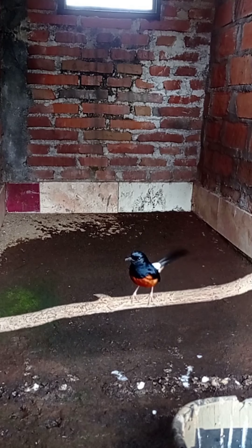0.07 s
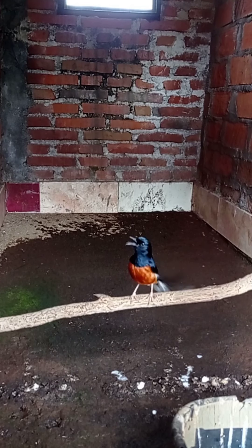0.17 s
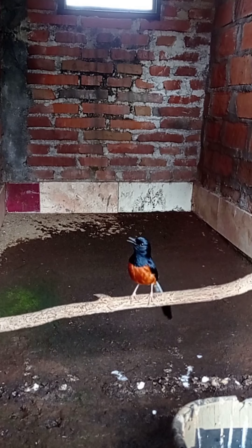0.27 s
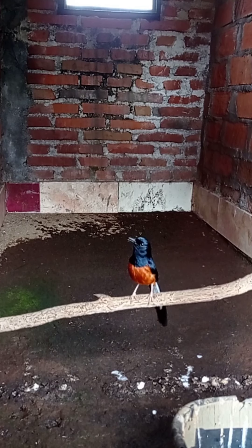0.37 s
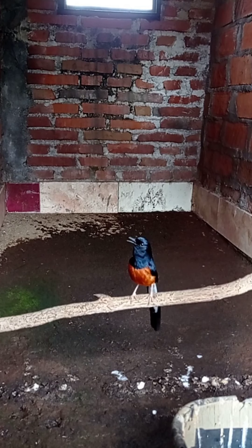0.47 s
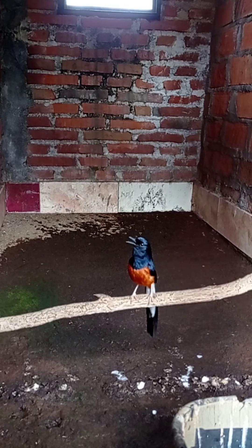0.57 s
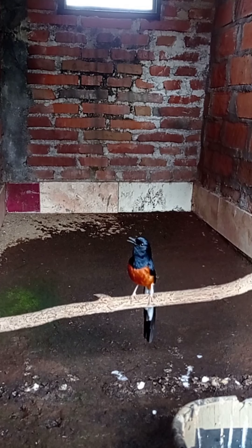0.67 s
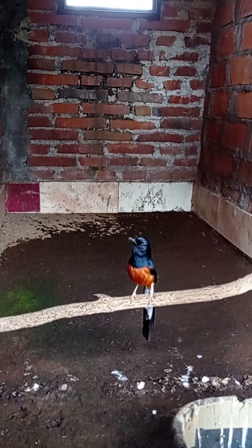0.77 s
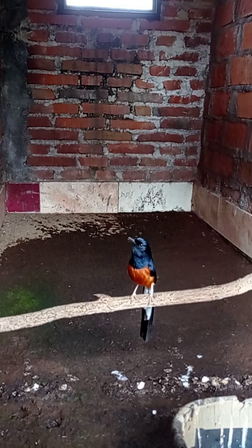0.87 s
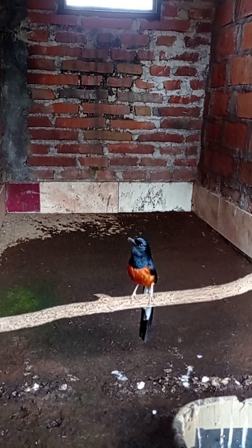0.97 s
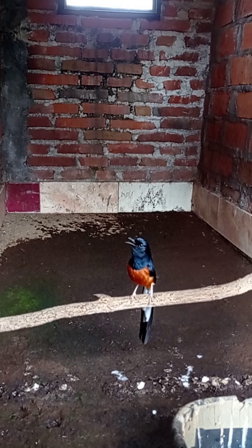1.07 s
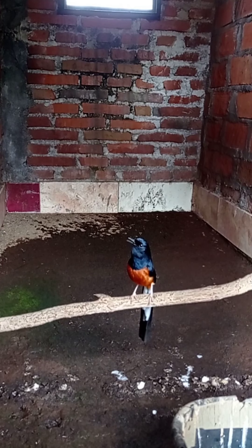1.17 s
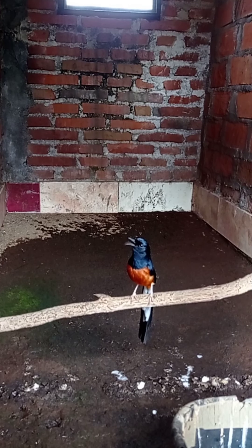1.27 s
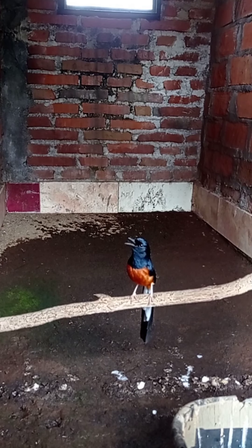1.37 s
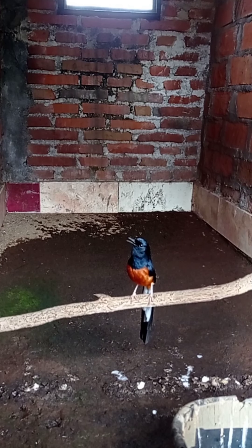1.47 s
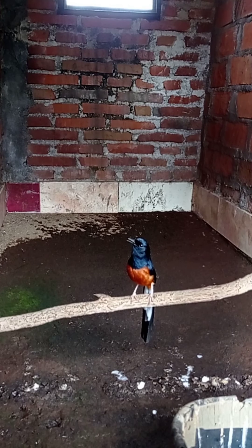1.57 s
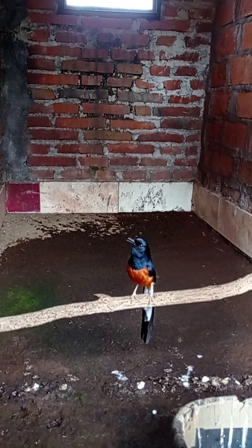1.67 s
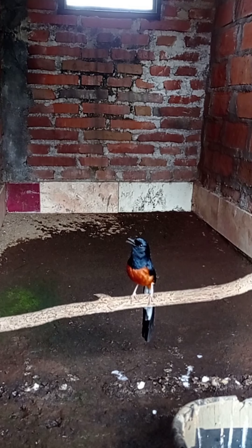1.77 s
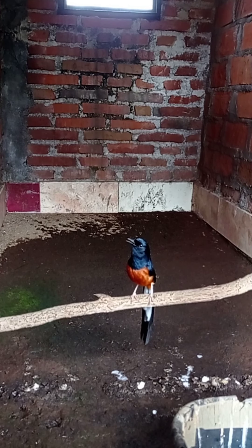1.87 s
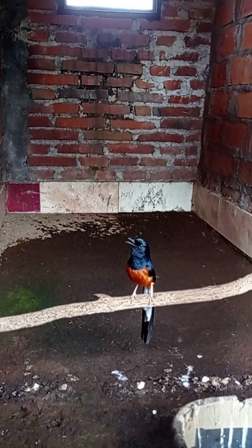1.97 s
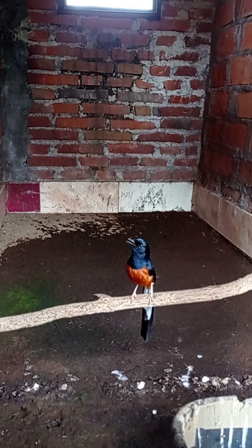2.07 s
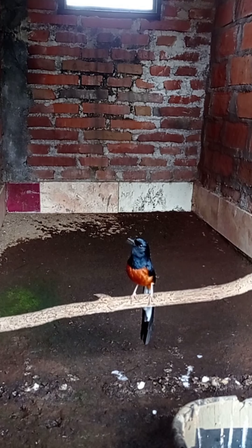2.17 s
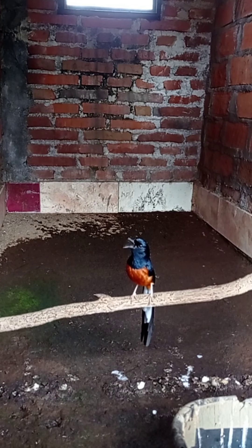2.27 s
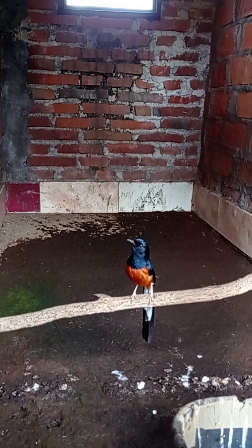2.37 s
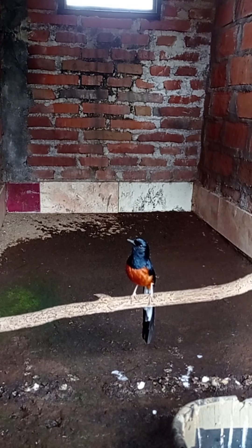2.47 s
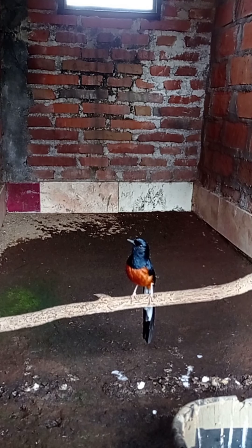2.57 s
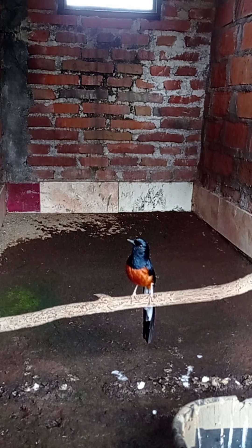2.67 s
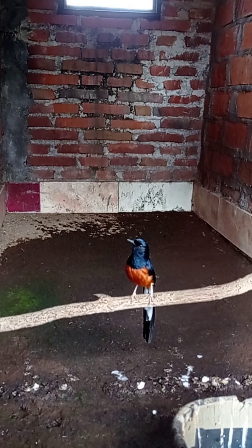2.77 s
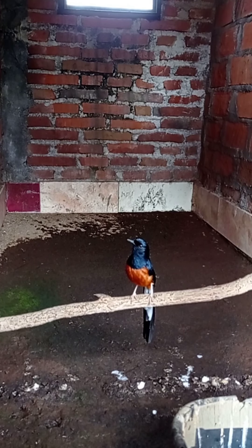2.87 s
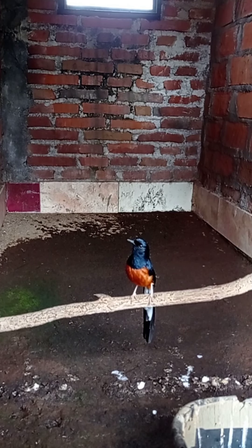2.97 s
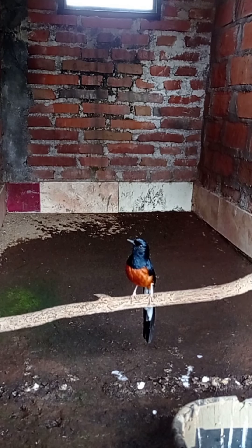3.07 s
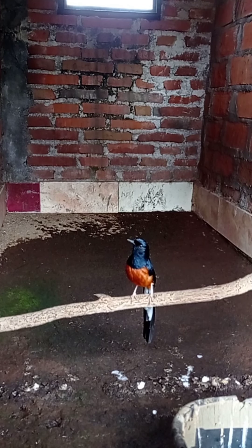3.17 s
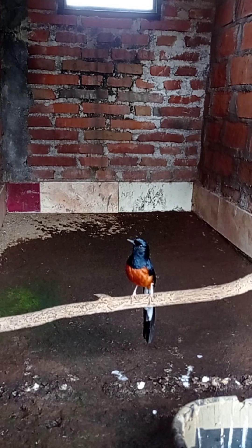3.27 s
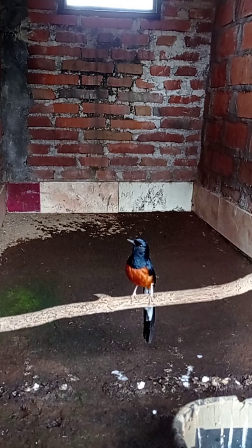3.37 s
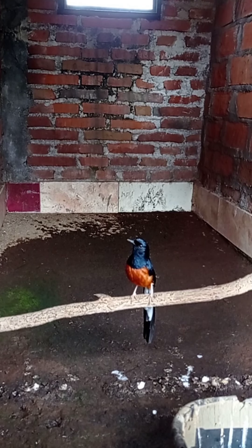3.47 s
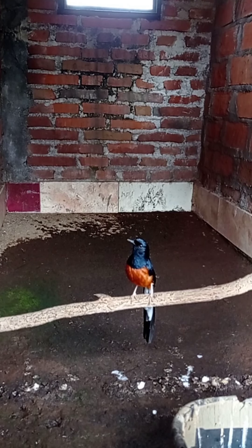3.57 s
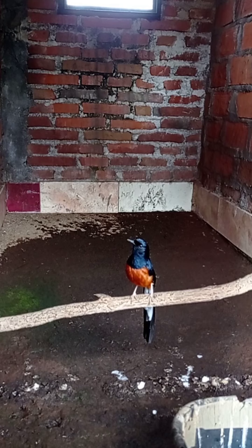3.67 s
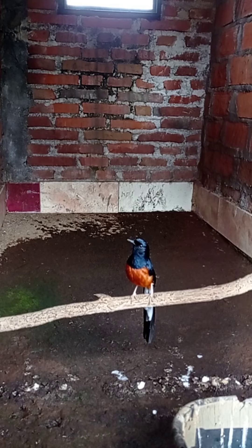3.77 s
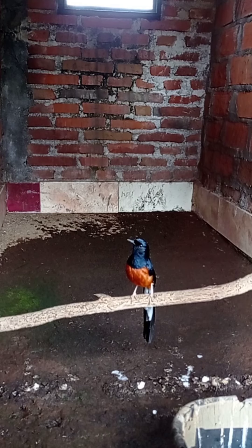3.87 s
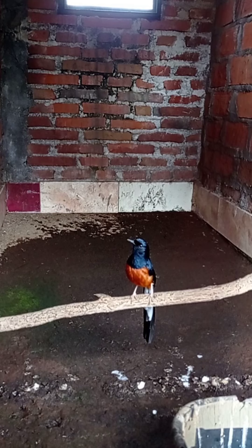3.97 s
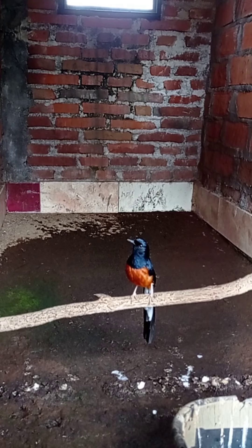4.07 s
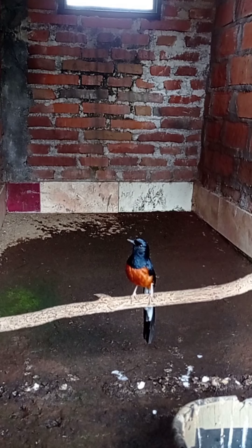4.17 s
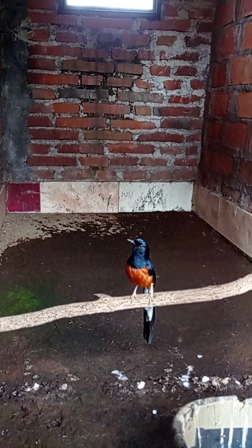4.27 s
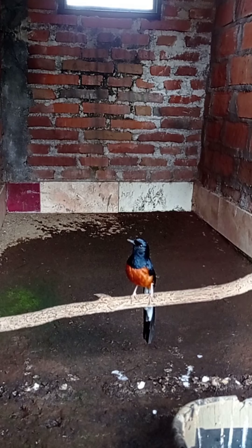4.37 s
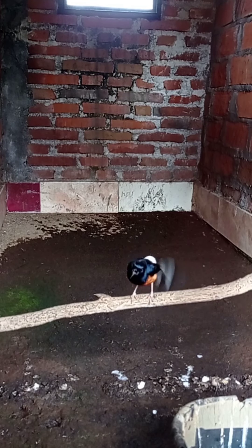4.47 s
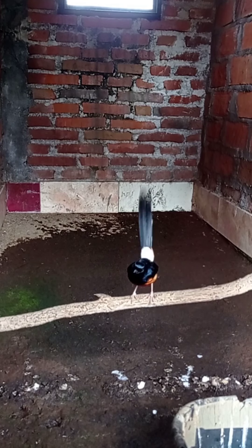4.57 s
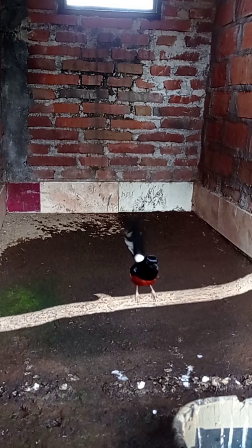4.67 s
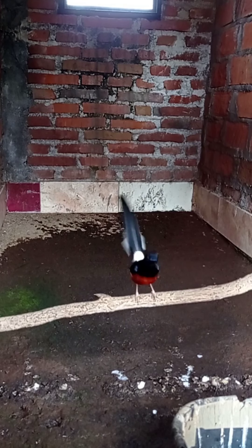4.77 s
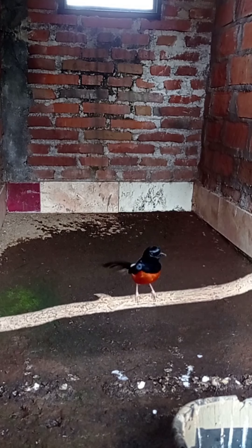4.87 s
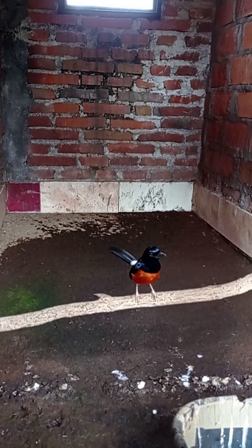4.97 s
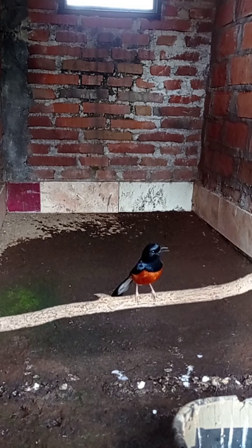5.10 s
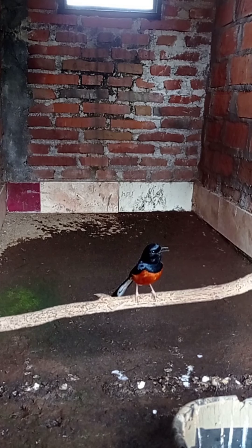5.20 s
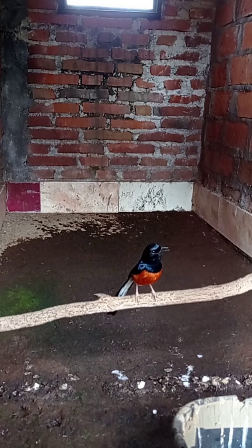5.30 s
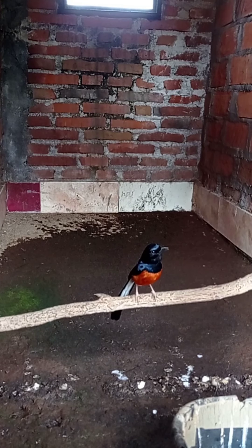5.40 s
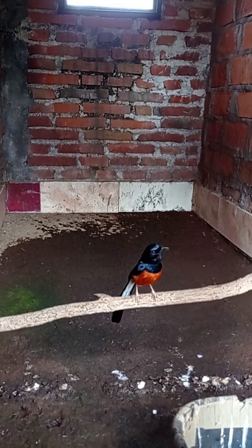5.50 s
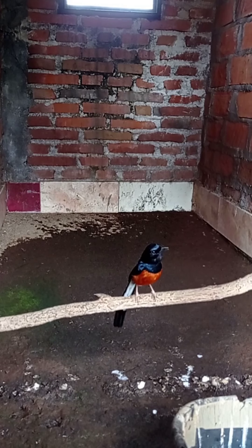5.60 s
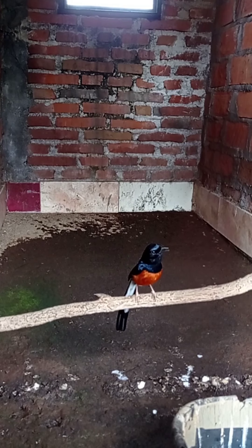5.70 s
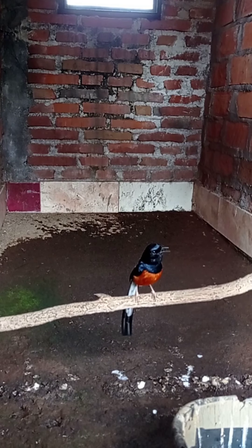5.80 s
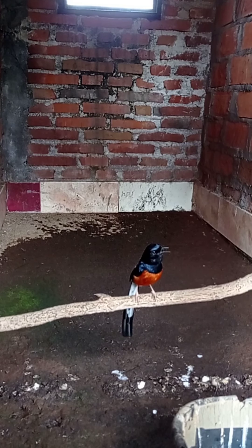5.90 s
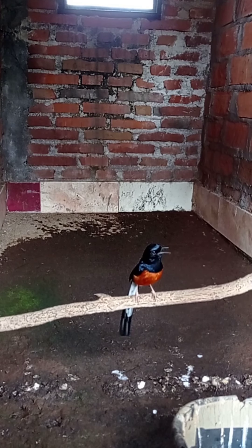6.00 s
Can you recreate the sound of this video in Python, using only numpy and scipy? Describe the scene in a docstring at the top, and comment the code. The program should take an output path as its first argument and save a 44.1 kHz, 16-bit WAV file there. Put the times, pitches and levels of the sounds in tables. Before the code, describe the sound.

In a small brick room with a brief echo, a nearby songbird delivers fast phrases of slurred whistles and steep sweeps, sometimes two tones at once. The song eases into quieter notes with faint rustles, breaks into three hard clacking calls, then finishes with a burst of loud whistles. Thin calls from other birds and a faint low hum lie underneath.

```python
"""Over a low hum, a white-rumped shama sings in a small brick aviary whose walls smear every note.
It opens with steep whistles and a hard rattling chak; faint pips, far-off chatter and a squawk join in.
Slurs and sweeps follow, sometimes two at once from the two sides of its syrinx (its voice box),
while other birds give faint calls. Soft rustles come near 4 s, then three loud chaks,
and the song ends in loud whistles with one soft bump among them."""
import sys
import numpy as np
from scipy import signal
from scipy.fft import rfft, irfft, next_fast_len
from scipy.io import wavfile
from scipy.ndimage import uniform_filter1d

SR = 44100
rng = np.random.default_rng(int(sys.argv[2]) if len(sys.argv) > 2 else 0)


def generate_wav(sig):
    """Save sig (samples, or channels by samples) to the path in sys.argv[1] as 16-bit PCM at SR."""
    pcm = np.round(np.clip(np.atleast_2d(sig).T, -1, 1) * 32767).astype(np.int16)
    wavfile.write(sys.argv[1], SR, pcm)


N = 266364
TIME = np.arange(N) / SR

# tone colour of the rumble: (frequency [Hz], relative level [dB])
RUMBLE_SPECTRUM = [(15, -58), (25, -24.5), (71, -5), (88, 4), (113, -11), (145, 5), (211, -6), (271, -11.5),
                   (322, -17), (447, -28.5), (500, -25), (650, -45.5), (1100, -120)]
# swells of the rumble: (middle [s], half length [s], deep part [dB], upper part [dB])
RUMBLE_RISES = [(0.29, 0.3, -58, -56), (0.947, .11, -67, -66), (1.21, 0.067, -73, -70.5),
                (2.222, .05, -68.5, -77), (2.714, 0.084, -66, -66.5), (3.022, 0.094, -69, -82),
                (3.323, 0.087, -66.5, -75.5), (3.78, 0.2, -60.5, -69), (4.418, 0.23, -63.5, -63.5),
                (4.93, 0.1, -59, -62.5), (5.184, 0.094, -58, -61), (5.643, 0.25, -60, -63)]
# tones of the hum: (pitch [Hz], relative level [dB])
HUM_TONES = [(86.1, -81.5), (140.0, -82), (339.1, -94)]
# hiss of still air: (frequency [Hz], relative level [dB])
AIR_SPECTRUM = [(100, -5.5), (400, -0.5), (800, -7.5), (2000, -15.5), (6000, -27), (10000, -28),
                (16000, -34)]
# the shama's notes; overlapping ones come from the two sides of the syrinx:
# (start [s], length [s], first pitch [Hz], middle pitch [Hz], last pitch [Hz], base level [dB],
#  loudest point [0-1], overtones let out by the beak [dB], their slope [dB per octave],
#  unsteadiness of the membranes [factor])
SHAMA_NOTES = [(-0.003, 0.044, 2080, 1452, 1290, -26, 0.33, 6, -5, 0.42),
               (-0.0, 0.012, 2913, 2265, 1980, -19.5, 0.24, 4, -11, 0.42),
               (0.311, 0.15, 1698, 2123, 1707, -22, 0.2, 4.5, -9.5, 0.6),
               (0.498, 0.051, 1444, 1585, 1750, -29.5, 0.97, 13.5, -19, 0.47),
               (0.555, 0.21, 1864, 2201, 1827, -7, 0.31, -4, -7, 0.8),
               (0.835, 0.15, 1400, 2123, 1845, -24, 0.56, -12, -1.5, 0.03),
               (0.894, 0.097, 1153, 1266, 1141, -22.5, 0.88, 7, -8, 0.3),
               (1.067, 0.098, 1312, 1584, 2342, -9.5, 0.81, -3.5, -0.5, 0.28),
               (1.231, 0.083, 1466, 1676, 2710, -10, 0.83, -5.5, 1.5, 0.19),
               (1.382, 0.015, 5090, 3240, 2520, -10.5, 0.62, 14.5, -15, 0.42),
               (1.465, 0.009, 4520, 3300, 2300, -11, 0.77, 11.0, -22, 0.33),
               (1.547, 0.044, 1962, 1802, 1550, -12.5, 0.63, -3, -0.5, 0.5),
               (1.717, 0.05, 2275, 1713, 1474, -13.5, 0.44, 0.5, -1, 0.49),
               (1.824, 0.14, 2742, 2833, 2870, -27, 0.28, 2.5, -10, 0.72),
               (1.875, 0.079, 3100, 1784, 2092, -15, 0.21, -3.5, 1, 1.14),
               (2.024, 0.067, 3470, 2162, 1933, -11, 0.23, -0.5, -7, 1.09),
               (2.16, 0.063, 2500, 2454, 2730, -27, 0.3, -4, -7, 0.54),
               (2.196, 0.049, 5250, 2890, 1443, -13.5, 0.05, 15.5, -13, 0.17),
               (2.234, 0.039, 1656, 1118, 1570, -42, 0, 3, -21, 0.42),
               (2.281, 0.019, 1822, 2940, 4020, -11, 0.52, 8, -23, 0.17),
               (2.306, 0.053, 3630, 4919, 5270, -17.5, 0.13, 20, -22, 0.07),
               (2.322, 0.19, 1834, 1818, 1761, -34.5, 0.21, -4, -7, 0.05),
               (2.457, 0.027, 1574, 1770, 1790, -44, 0.35, -9, -4, 0.2),
               (2.537, 0.11, 2007, 2060, 1990, -20.5, 0.7, -2.5, -20.5, 0.09),
               (2.74, 0.068, 2144, 2187, 2280, -22, 0.5, -5.5, -10.5, 0.31),
               (2.89, 0.094, 2844, 3186, 3386, -31, 0.83, 13, -35.5, 0.29),
               (2.971, 0.11, 3345, 3370, 3383, -23, 0.71, 0.5, -18, 0.28),
               (3.193, 0.17, 3367, 3757, 3895, -50.5, 0.47, 10, -18, 0.17),
               (3.203, 0.15, 1582, 1498, 1592, -37, 0.43, 0.5, -8, 0.1),
               (3.413, 0.1, 1462, 1570, 1684, -23.5, 0.57, -11.5, 0.5, 0.23),
               (3.485, 0.065, 1870, 2704, 2860, -47.5, 1, -7, 5, 0.25),
               (3.584, 0.099, 1484, 1833, 2243, -20.5, 0.91, -15, 2.5, 0.42),
               (3.753, 0.071, 1354, 2003, 2286, -20.5, 0.87, -10.5, -0.5, 0.14),
               (3.881, 0.069, 1507, 2282, 2390, -23.5, 0.33, -12, 1, 0.07),
               (4, 0.09, 1548, 3185, 3620, -26.5, 0.25, 2.5, -20, 0.77),
               (5.149, 0.11, 2070, 2146, 2206, -42, 0.64, 35.5, -34, 0.32),
               (5.22, 0.069, 914, 964, 1014, -39.5, 0.5, 5.5, -14, 0.35),
               (5.255, 0.065, 2163, 2183, 2064, -14, 0.32, 7.5, -24, 0.2),
               (5.264, 0.11, 1056, 1448, 2000, -30, 1, -3.5, -11, 0.26),
               (5.316, 0.042, 2084, 2041, 1970, -5, 0.61, -3.5, -11, 0.01),
               (5.385, 0.071, 2288, 1972, 1980, -29, 0.36, -10.5, -19, 0.31),
               (5.415, 0.044, 2097, 1475, 1296, -27.5, 0.15, -4.5, -21.5, 0.2),
               (5.459, 0.18, 1316, 916, 848, -40.5, 0, 4.5, -17, 0.5),
               (5.485, 0.25, 1476, 1404, 1520, -9, 0.79, -9.5, -6.5, 0.02),
               (5.735, 0.019, 1586, 1625, 1740, -25.5, 0.12, -4, -4.5, 0.2),
               (5.827, 0.038, 2338, 2061, 2260, -6, 0.45, 2.5, -9, 0.42),
               (5.886, 0.032, 2310, 2102, 2210, -10.5, 0.32, 0.5, -19, 0.05),
               (5.944, 0.027, 2226, 2257, 2000, -6.5, 0.42, -1.5, -5, 0.14),
               (5.984, 0.033, 2094, 2226, 2018, -7, 0.19, 0.5, -18, 0.23)]
# overtones after passing the throat: (frequency [Hz], relative level [dB])
WHISTLE_THROAT = [(2800, -19.5), (4300, -34), (5100, -33), (5900, -34.5), (7200, -31), (7900, -41),
                  (8700, -33), (10300, -25), (12000, -53), (13300, -56), (15000, -40), (16500, -51.5)]
# air forced through the syrinx: (frequency [Hz], relative level [dB])
RASP_SPECTRUM = [(1500, -40), (3000, -9), (5000, -5), (6200, -3.5), (7800, -9), (9000, -6), (10500, -3.5),
                 (11600, -2.5), (13000, -11.5), (15000, -10), (16500, -19.5)]
# chaks: (start [s], level [dB], length [s], ring of the beak [dB], lowest throat resonance [Hz])
CHAK_CALLS = [(0.032, -19.5, 0.017, 5.5, 800), (1.177, -38.5, 0.018, 4.5, 1020),
              (1.355, -38.5, 0.018, 4.5, 1010), (1.595, -34.5, 0.018, 9, 1000),
              (4.171, -47.5, 0.016, 3, 1102), (4.5507, -17.5, 0.0071, 7, 1100),
              (4.713, -21, 0.015, 5.5, 720), (4.92, -23, 0.011, 4, 704)]
# tone colour of a chak: (frequency [Hz], relative level [dB])
CHAK_SPECTRUM = [(600, -9.5), (1100, -7.5), (1900, -9.5), (2900, 2.5), (4500, 1), (5300, -2.5), (6500, 3),
                 (8000, -4), (10500, -17), (13000, -33), (15000, -12), (16500, -35.5)]
# pips of a smaller bird: (start [s], level [dB])
PIP_CALLS = [(0.137, -33), (.218, -39), (0.38, -31.5), (0.455, -32), (0.537, -31), (0.614, -37)]
# tone colour of far-off chatter: (frequency [Hz], relative level [dB])
CHATTER_SPECTRUM = [(1350, -30.5), (2300, -8), (2530, -12.5), (3780, -3.5), (4890, -7), (6350, -11),
                    (7050, -17), (9040, -27), (12000, -38.5), (15600, -67), (22000, -120)]
# bouts of chatter: (middle [s], half length [s], level [dB])
CHATTER_SWELLS = [(.19, .05, -43), (.48, .12, -64), (2.46, 0.13, -53.5), (2.66, 0.12, -55),
                  (4.44, 0.22, -63.5), (4.81, 0.11, -59.5), (5.06, 0.1, -55)]
# the rising squawk: (time [s], pitch [Hz], relative level [dB])
SQUAWK_PATH = [(.22, 1186, -46), (.242, 1401, -24), (.268, 1544, -16.5), (.287, 1796, -17.5),
               (.303, 1960, -34)]
# the wide open throat of the squawk: (frequency [Hz], relative level [dB])
OPEN_THROAT = [(1400, -19.5), (2000, -13.5), (3000, -2), (4500, -6.5), (6200, -13.5), (7500, -21),
               (9500, -35), (13000, -52), (15000, -46.5)]
# faint calls of other birds: (start [s], level [dB], pitch [Hz], length [s], roughness [0-1])
NEIGHBOUR_CALLS = [(1.784, -54.5, 4400, 0.055, 0.3), (2.776, -49, 3360, 0.038, 0.3),
                   (5.343, -46, 3512, 0.11, 0.21), (5.348, -58, 9600, .09, 0.4),
                   (5.671, -42.5, 5540, 0.075, 0.4)]
# soft rustles: (middle [s], half length [s], level [dB])
RUSTLE_SWELLS = [(3.71, 0.062, -63.5), (4.007, 0.045, -64.5), (5.707, 0.15, -73.5)]
# tone colour of a rustle: (frequency [Hz], relative level [dB])
RUSTLE_SPECTRUM = [(150, -23.5), (330, 4.5), (600, 0.5), (1200, -20.5), (3000, -4.5), (9000, -40.5)]
# echoes off the nearest walls and the floor: (delay [s], strength [factor])
WALL_ECHOES = [(.0023, 0.18), (.0052, 0.25), (.0081, 0.34), (.0124, 0.16), (.0178, 0.087), (.0235, 0.073),
               (.031, 0.066)]
# ring of the brick room: (frequency [Hz], time to fade by 60 dB [s])
ROOM_FADE = [(300, 0.2), (1500, 0.21), (2500, 0.18), (4500, 0.15), (7000, 0.14), (11000, 0.12),
             (16000, 0.15)]


def gain_of(db):
    """Turns decibels into amplitude."""
    return 10 ** (np.asarray(db) / 20)


def evened(x):
    """Scales a signal to an average size (rms) of one."""
    return x / np.sqrt(np.mean(x ** 2) + 1e-20)


def read(points, hz):
    """Looks up a table at any frequency, with octaves evenly spaced."""
    table_hz, value = np.transpose(points)
    return np.interp(np.log(hz + 1), np.log(table_hz + 1), value)


def add(mix, start_s, sound):
    """Mixes a sound in at the given time."""
    start = round(start_s * SR)
    sound = sound[max(-start, 0):]
    part = mix[max(start, 0):][:len(sound)]
    part += sound[:len(part)]


def coloured(points):
    """Steady noise with the given tone colour."""
    count = next_fast_len(N, True)
    colour = gain_of(read(points, np.fft.rfftfreq(count, 1 / SR)))
    return evened(irfft(rfft(rng.standard_normal(count)) * colour, count)[:N])


def wander(rate_hz):
    """Smooth random motion, about one in size."""
    count = 32768
    hz = np.fft.rfftfreq(count, N / SR / count)
    coarse = evened(irfft(rfft(rng.standard_normal(count)) * np.exp(-(hz / rate_hz) ** 2), count))
    return np.interp(np.arange(N) * count / N, np.arange(count), coarse)


def swells(rows):
    """Amplitude of smooth swells that rise and fall alike."""
    return sum(gain_of(db) * np.exp(-((TIME - middle) / half) ** 2) for middle, half, db in rows)


def patchy(x, db, size):
    """Lets short patches at changing pitches stand out or drop away."""
    spectra = signal.stft(x, nperseg=size)[2]
    patches = uniform_filter1d(rng.standard_normal(spectra.shape), size=7, axis=0)
    patches = uniform_filter1d(patches, size=7, axis=1)
    return signal.istft(spectra * gain_of(db * evened(patches)), nperseg=size)[1][:N]


def contour(rows, edge_s=0.0038):
    """Times, pitch and amplitude of one call, with rounded corners and soft ends."""
    times, *columns = np.transpose(rows)
    t = np.arange(times[0] - edge_s, times[-1] + edge_s, 1 / SR)
    hz, db = (uniform_filter1d(np.interp(t, times, c), size=130, mode="nearest") for c in columns)
    ends = np.clip(np.minimum(t - t[0], t[-1] - t) / (2 * edge_s), 0, 1)
    return t, hz, gain_of(db) * np.sin(np.pi / 2 * ends) ** 2


def sine(hz):
    """A pure tone that follows a changing pitch."""
    return np.sin(2 * np.pi * np.cumsum(hz) / SR)


def partials(hz, throat, first, slope_db):
    """Tones of a vibrating membrane, shaped by the throat and tilted by slope_db an octave."""
    phase = 2 * np.pi * np.cumsum(hz) / SR
    orders = np.arange(first, 11)[:, None]  # multiples of the pitch
    level = gain_of(read(throat, orders * hz) + slope_db * np.log2(orders / first))
    return (level * (orders * hz < SR / 2) * np.sin(orders * phase)).sum(0)


def rumble(split_hz=112, floors_db=(-88.5, -78), lumpy_db=1.8):
    """Low noise whose deep and upper parts swell together by different amounts."""
    spectrum = rfft(coloured(RUMBLE_SPECTRUM))
    deep = np.fft.rfftfreq(N, 1 / SR) < split_hz
    middle, half, *levels = np.transpose(RUMBLE_RISES)
    out = np.zeros(N)
    for band, floor_db, db in zip((deep, ~deep), floors_db, levels):
        level = gain_of(floor_db) + swells(zip(middle, half, db))
        out += level * evened(irfft(spectrum * band, N))
    return out * gain_of(lumpy_db * wander(13))


def background(hum_db=-4.0, air_db=-81, sway_db=3):
    """A wavering hum, low rumble and the faint hiss of still air."""
    hum = sum(gain_of(db + hum_db + sway_db * wander(3.9)) * sine(hz + wander(2.7))
              for hz, db in HUM_TONES)
    return np.sqrt(2) * hum + rumble() + gain_of(air_db) * coloured(AIR_SPECTRUM)


def note(start, length, first_hz, middle_hz, last_hz, db, loudest, scoop_octaves=.22, swell_db=14):
    """Times, pitch and amplitude of one note: it scoops up as the air starts, slides and fades."""
    lead, release = .011 + .14 * length, .004 + .19 * length
    t = np.arange(start - lead, start + length + release, 1 / SR)
    progress = np.clip((t - start) / length, 0, 1)
    early, late = np.clip((start - t) / lead, 0, 1), np.clip((t - start - length) / release, 0, 1)
    slide = first_hz * (last_hz / first_hz) ** progress
    bend = (middle_hz / np.sqrt(first_hz * last_hz)) ** (1 - (2 * progress - 1) ** 2)
    hz = slide * bend * 2 ** (-scoop_octaves * early ** 2)
    loudest = np.clip(loudest, .05, .95)
    from_peak = np.maximum((loudest - progress) / loudest, (progress - loudest) / (1 - loudest))
    # the faster a note sweeps, the more its loudness gathers into one crack
    crack_db = 0.05 * abs(np.log2(last_hz / first_hz)) / length
    level = gain_of(db + .25 * crack_db - (swell_db + crack_db) * from_peak ** 2)
    return t, hz, level * ((1 - early) * (1 - late)) ** 2


def song(waver=0.018, jitter=0.0036, drift=.003, shimmer_db=7.5, overtones_db=-3.0, rasp_db=-47):
    """The shama's whistles and overtones; pushed hard, the membranes tremble and the air rasps."""
    tone, overtones, effort = np.zeros((3, N))
    tremble = waver * wander(110) + jitter * wander(700)
    shimmer = shimmer_db * np.tanh(wander(150))
    sway = drift * wander(30)
    for *shape, beak_db, slope_db, unsteady in SHAMA_NOTES:
        t, hz, level = note(*shape)
        hz = hz * (1 + np.interp(t, TIME, sway) + unsteady * np.interp(t, TIME, tremble))
        level = level * gain_of(unsteady * np.interp(t, TIME, shimmer))
        add(tone, t[0], level * sine(hz))
        add(overtones, t[0], level * gain_of(beak_db) * partials(hz, WHISTLE_THROAT, 2, slope_db))
        add(effort, t[0], level * unsteady ** 2)
    glints = gain_of(overtones_db) * patchy(overtones, db=5.0, size=256)
    return tone + glints + gain_of(rasp_db) * effort * coloured(RASP_SPECTRUM)


def chaks(snap_hz=190, decay_s=0.0039, beak_hz=6400, beak_width_hz=1500, throat_q=2.05):
    """Each chak is a few quick noisy snaps, ringing in the throat and the beak."""
    out, lead = np.zeros(N), .005
    t = np.arange(4096) / SR - lead
    hz = np.fft.rfftfreq(len(t), 1 / SR)
    ring = np.exp(-((hz - beak_hz) / beak_width_hz) ** 2)
    pulses = (t >= 0) * np.exp(-(t * snap_hz % 1) / snap_hz / decay_s)
    for start, db, length, ring_db, throat_hz in CHAK_CALLS:
        snaps = pulses * np.clip((length - t) / decay_s, 0, 1) * rng.standard_normal(len(t))
        # little sound gets out below the throat's lowest resonance
        u = 1j * hz / throat_hz
        throat = u ** 2 / (u ** 2 + u / throat_q + 1) * u ** 2 / (u ** 2 + u + 1)
        colour = throat * evened(gain_of(read(CHAK_SPECTRUM, hz) + ring_db * ring))
        add(out, start - lead, 2 * gain_of(db) * irfft(rfft(snaps) * colour))
    return out


def pips(top_hz=5250, end_hz=4600, length_s=0.025):
    """A smaller bird's short falling whistles, nearly pure and all of one shape."""
    out = np.zeros(N)
    for start, db in PIP_CALLS:
        t, hz, level = contour([(start, top_hz, db - 15.5),
                                (start + length_s / 2, (top_hz + end_hz) / 2, db),
                                (start + length_s, end_hz, db - 2.0)])
        overtones = gain_of(4.5) * partials(hz, WHISTLE_THROAT, first=2, slope_db=-12.0)
        add(out, t[0], level * (sine(hz) + overtones))
    return out


def chatter(floor_db=-80.5):
    """Far-off rasping calls, blurred to a patchy hiss."""
    hiss = evened(patchy(coloured(CHATTER_SPECTRUM), db=5.0, size=512))
    return hiss * (gain_of(floor_db) + swells(CHATTER_SWELLS))


def squawk(jitter=0.039):
    """A rough rising call from an open throat, its overtones louder than its lowest tone."""
    out = np.zeros(N)
    t, hz, level = contour(SQUAWK_PATH)
    hz = hz * (1 + jitter * np.interp(t, TIME, wander(1200)))
    add(out, t[0], level * partials(hz, OPEN_THROAT, first=0.97, slope_db=3.5))
    return out


def neighbours(jitter=0.071):
    """Other birds' notes swell and fade around one pitch, roughened by a fast wobble."""
    out, rasp = np.zeros(N), jitter * wander(600)
    for start, db, hz, length, rough in NEIGHBOUR_CALLS:
        path = [(start, hz, db - 3), (start + length / 2, hz, db), (start + length, hz, db - 9)]
        t, pitch, level = contour(path)
        add(out, t[0], level * sine(pitch * (1 + rough * np.interp(t, TIME, rasp))))
    return out


def rustles():
    """Brief dull swells of noise."""
    return coloured(RUSTLE_SPECTRUM) * swells(RUSTLE_SWELLS)


def bump(time_s=5.8, hz=125, db=-41, half_length_s=0.0094):
    """One soft bump: a few cycles of a low tone."""
    return swells([(time_s, half_length_s, db)]) * np.sin(2 * np.pi * hz * (TIME - time_s))


def aviary(front, aside, direct_db=-3, aside_db=-10, tail_db=-4.0, build_s=0.003):
    """Direct sound, wall echoes and a ringing tail; sound aimed aside comes mostly off the walls."""
    count = SR // 2
    hz, t, spectra = signal.stft(rng.standard_normal(count), SR, nperseg=256)
    fade = gain_of(-60 * t / read(ROOM_FADE, hz)[:, None])  # the treble dies sooner
    tail = signal.istft(spectra * fade, SR, nperseg=256)[1][:count]
    tail *= 1 - np.exp(-np.arange(count) / SR / build_s)
    response = gain_of(tail_db) * tail / np.linalg.norm(tail)
    for delay, strength in WALL_ECHOES:
        add(response, delay, gain_of([direct_db]) * strength)
    echoes = signal.fftconvolve(front + aside, response)[:N]
    return gain_of(direct_db) * front + gain_of(aside_db) * aside + echoes


def scene(chak_front=0.15):
    """The birds in their room over the background; the beak aims the chaks mostly past the listener."""
    voice, rattle = song(), chaks()
    front = voice + squawk() + pips() + chak_front * rattle
    aside = (1 - chak_front) * rattle + neighbours()
    return (aviary(front, aside) + chatter() + background() + rustles() + bump())[None]


def record(dry, cutoff_hz=15900):
    """Cuts away the very highest treble."""
    lowpass = signal.firwin(255, cutoff_hz, window=("kaiser", 9), fs=SR)
    return signal.oaconvolve(dry, lowpass[None], "same")


dry = scene()
out = record(dry)
generate_wav(out)
```